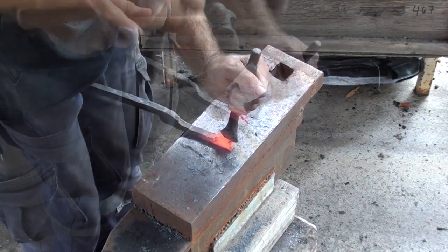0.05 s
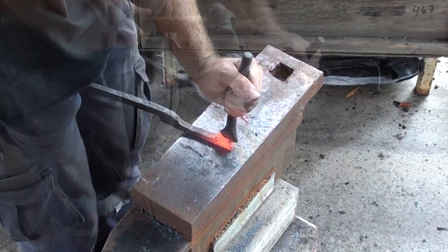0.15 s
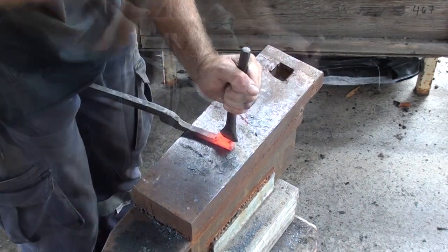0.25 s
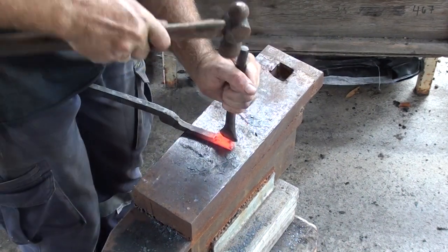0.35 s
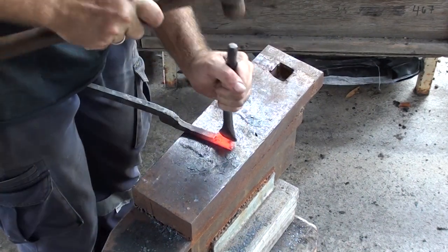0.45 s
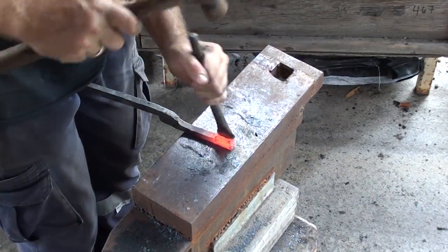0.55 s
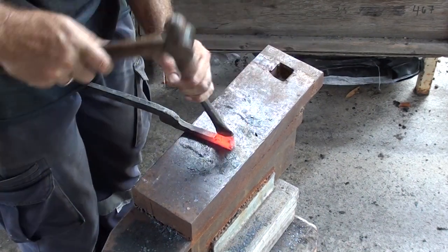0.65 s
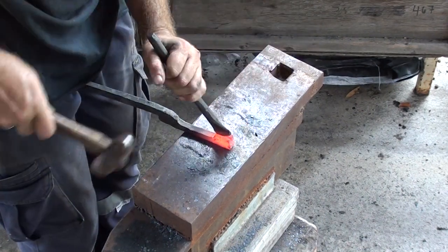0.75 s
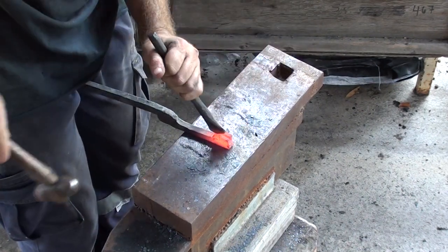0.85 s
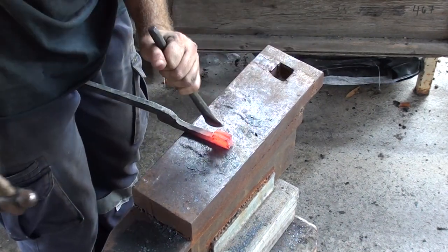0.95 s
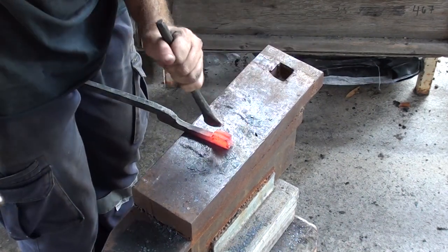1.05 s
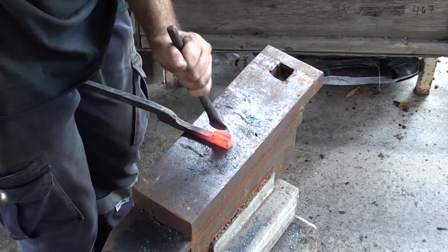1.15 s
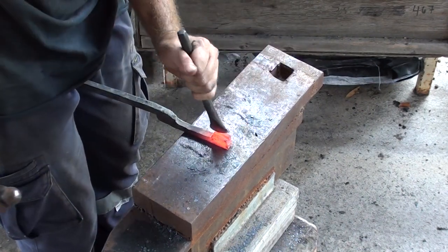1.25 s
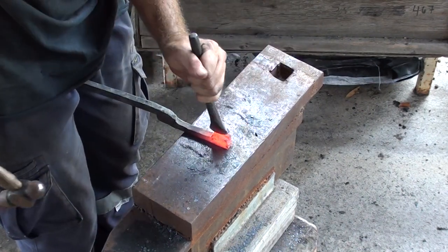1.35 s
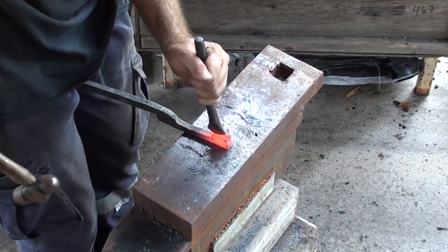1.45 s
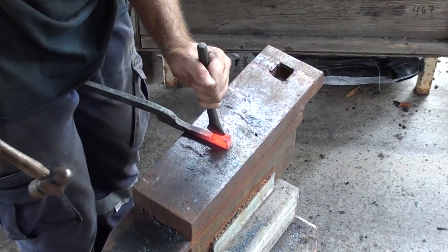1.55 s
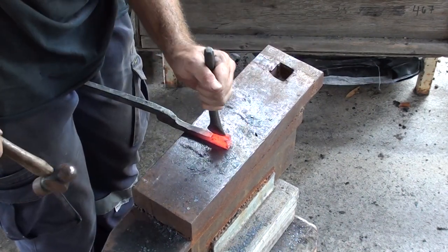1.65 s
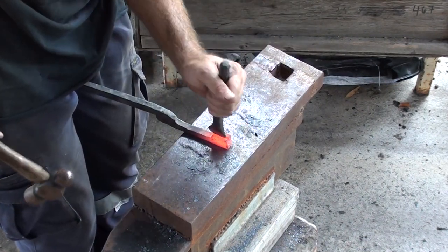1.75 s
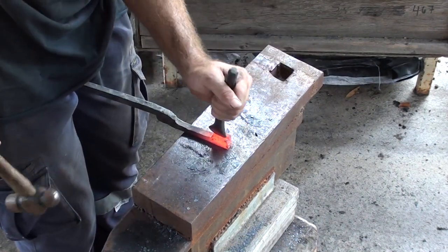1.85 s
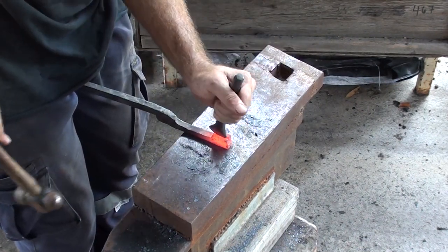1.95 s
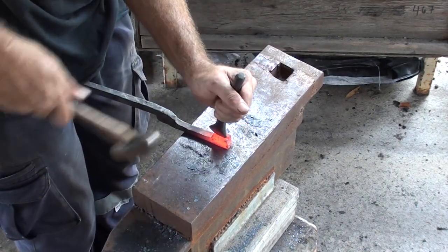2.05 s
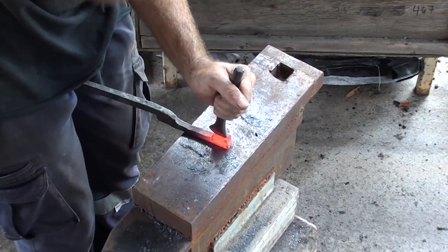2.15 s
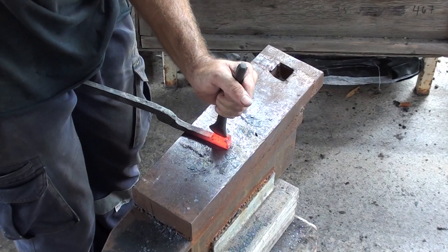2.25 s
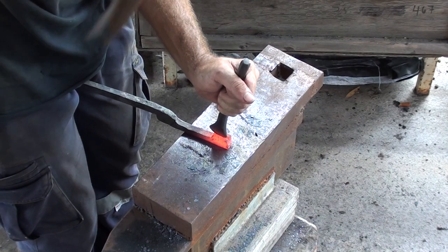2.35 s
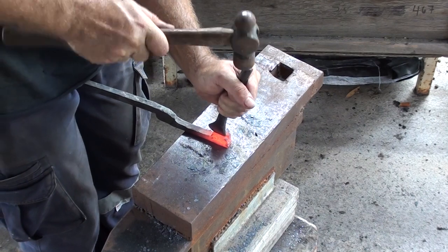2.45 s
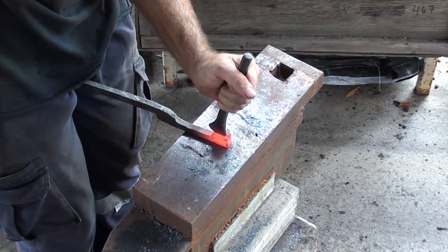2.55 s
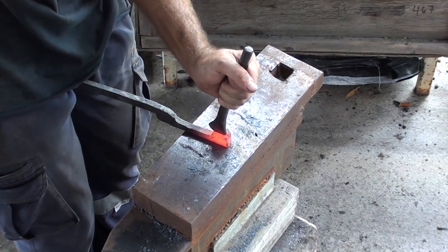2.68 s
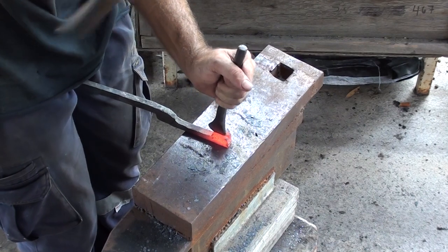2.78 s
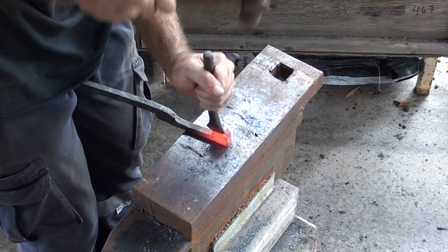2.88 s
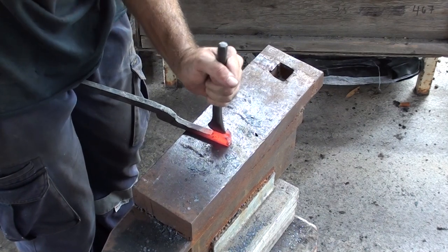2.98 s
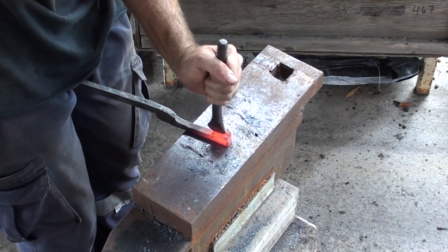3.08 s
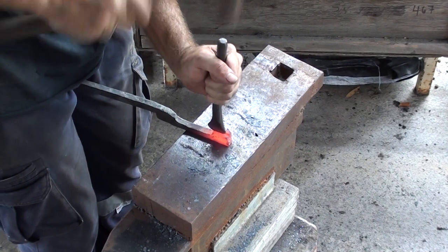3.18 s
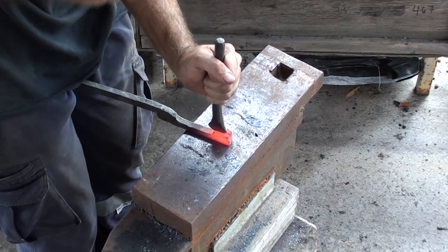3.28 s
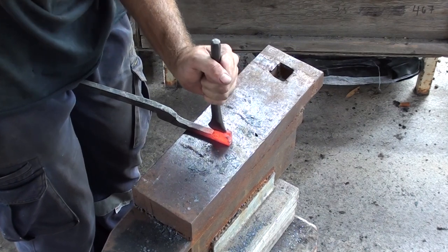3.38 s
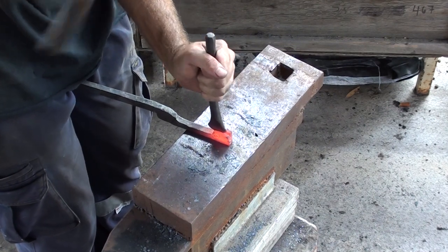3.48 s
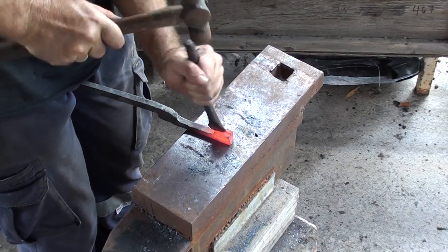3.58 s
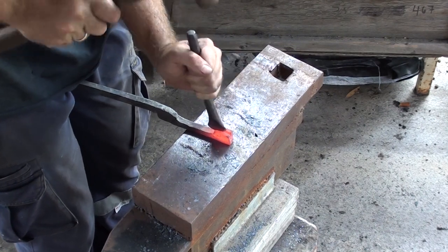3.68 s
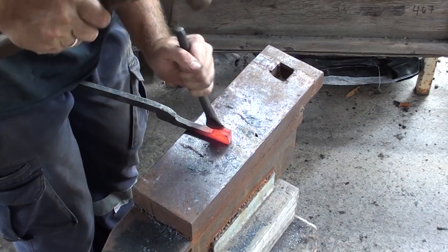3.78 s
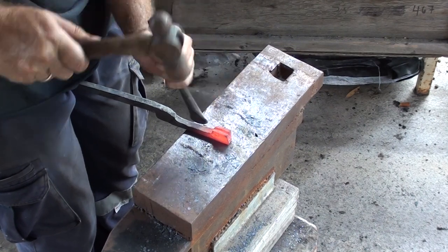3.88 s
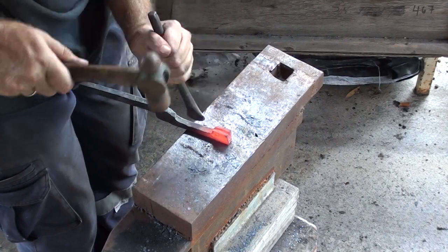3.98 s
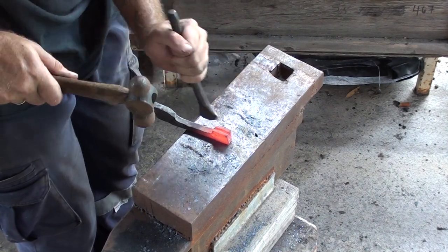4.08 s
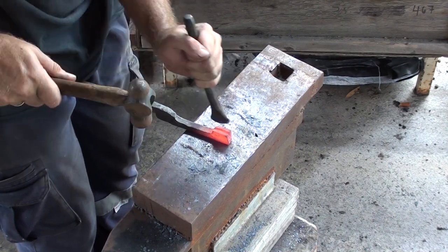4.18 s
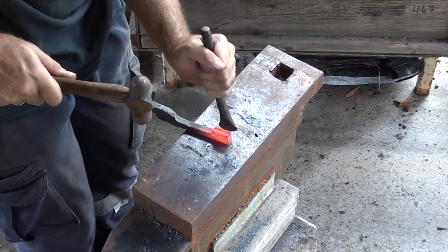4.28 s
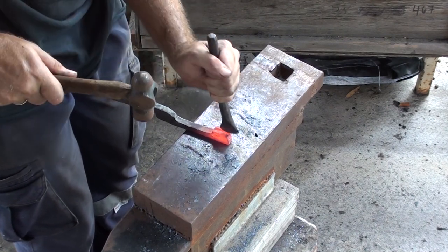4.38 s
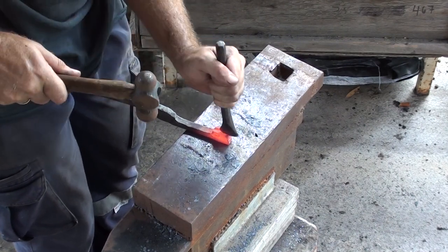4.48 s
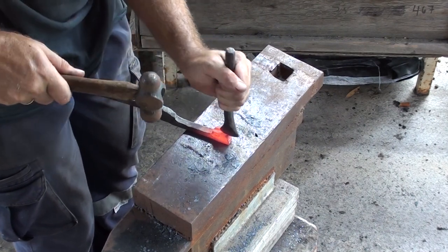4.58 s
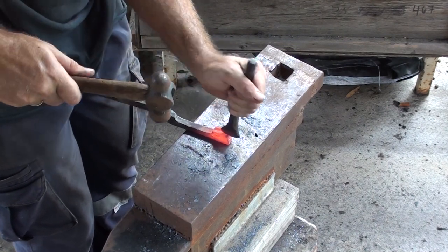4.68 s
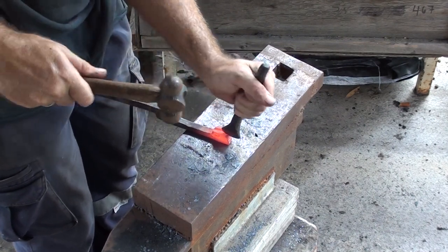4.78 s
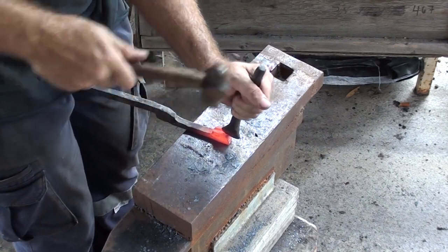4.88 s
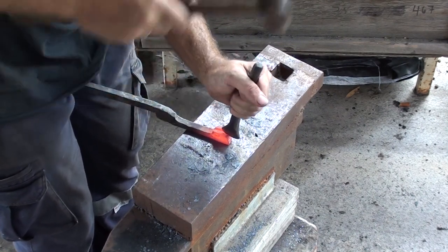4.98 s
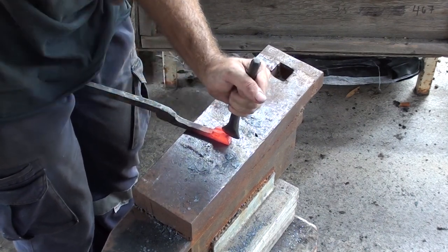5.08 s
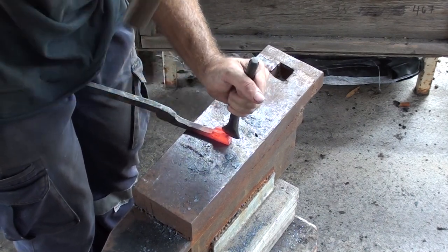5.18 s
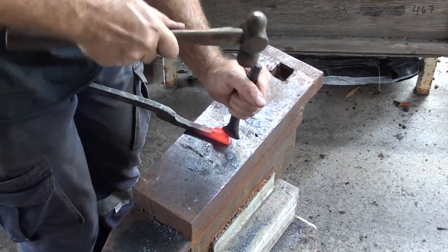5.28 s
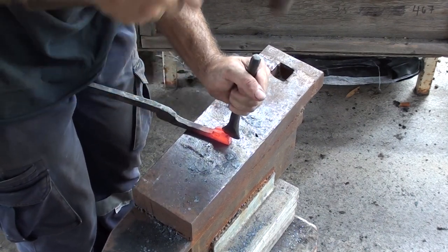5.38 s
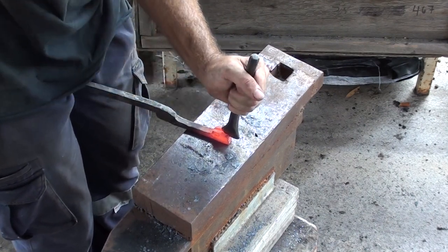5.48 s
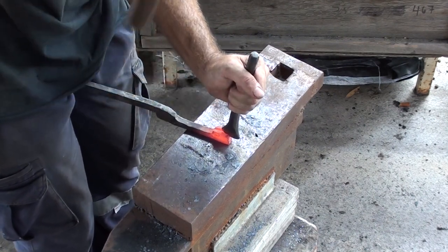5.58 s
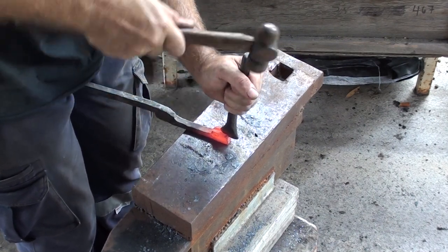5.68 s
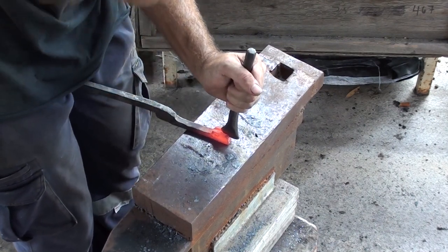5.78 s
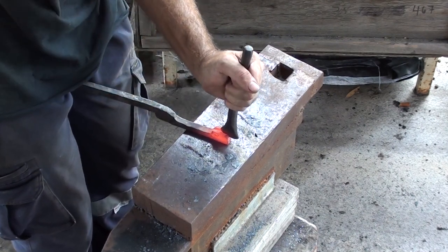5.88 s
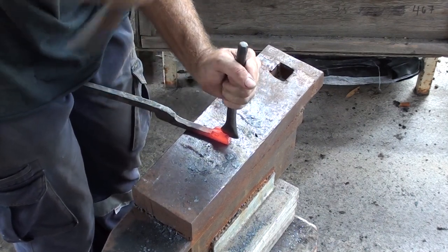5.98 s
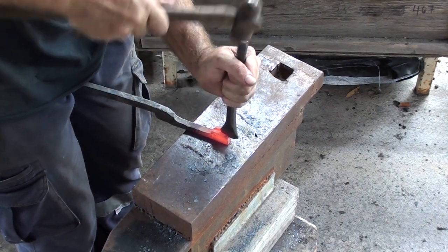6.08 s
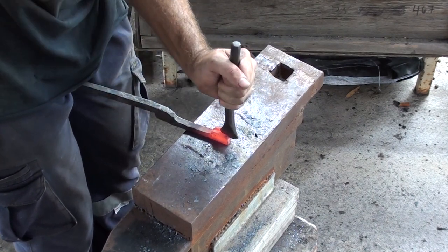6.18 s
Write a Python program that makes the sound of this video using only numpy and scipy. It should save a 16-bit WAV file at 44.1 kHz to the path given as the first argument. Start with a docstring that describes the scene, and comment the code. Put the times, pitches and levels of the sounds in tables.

```python
"""In a workshop with hard walls, a smith hammers a chisel into a red-hot bar on an anvil.
The blows come in three groups. Each one cracks, makes the steel ring and echoes round the room.
Between groups the chisel is set down again with light clicks, over a steady rush, a hiss and a hum.
A nearby camera's limiter (an automatic volume control) holds each blow flat for about a tenth
of a second, and the noise of the shop creeps back afterwards."""
import sys
import numpy as np
from scipy import signal
from scipy.fft import rfft, irfft, next_fast_len
from scipy.io import wavfile
from scipy.ndimage import uniform_filter1d

SR = 44100
rng = np.random.default_rng(int(sys.argv[2]) if len(sys.argv) > 2 else 0)


def wav_record(signal):
    """Record a signal, one row per channel, as 16-bit PCM in the file named by sys.argv[1]."""
    frames = np.transpose(np.atleast_2d(signal))
    bounded = np.clip(frames, -1, 1)
    # unit amplitude maps onto the largest positive 16-bit level
    quanta = np.round(bounded * 32767).astype(np.int16)
    wavfile.write(sys.argv[1], SR, quanta)


N = 275179

AGE = np.arange(SR) / SR  # seconds since a hit
ANVIL_LOW_HZ, ANVIL_MID_HZ, ANVIL_HIGH_HZ, CLANG_HZ = 581, 952, 2395, 1918
# The notes of the struck bar. Each row: pitch in Hz, spread in Hz, level in dB, seconds to fade 60 dB.
BAR_NOTES = [(880, 70, -18.5, .34), (955, 20, -14, .36), (1260, 16, -14.5, .34), (1840, 50, -25, .24),
             (2500, 70, -26, .22), (3350, 110, -22, .25), (4220, 45, -26, .2)]


def hammer_blows(walls):
    """Each blow cracks and rings the anvil, bar and tools, in shares that depend on where it lands."""
    # Each row: start in seconds, force in dB, brightness in dB per octave, gains in dB for anvil, bar,
    # clang, hammer head and chisel, then the contact's resonance in Hz and its height in dB.
    blows = [(-0.014, -1, 0.5, 0, -5.5, -3.5, -0.5, 2, 6300, 11),
             (0.3535, 0, 0.2, 2, -4.5, -2.5, -6.5, 3, 5600, 3.5),
             (2.4762, 2.5, -0.7, 1.5, -1, -1, -1, 4.5, 7020, 9),
             (2.8616, 1, -0.24, -1, 1.5, -7, 2, 5.5, 5330, 5),
             (3.2310, -0.5, -0.55, -1, 3.5, -3, -22, 1.5, 7500, 2.5),
             (3.586, -1.5, -0.6, 1, 0.5, 0.5, 2, 1, 2810, 0),
             (5.3086, -0.5, 0, -0.5, -0.5, -1.5, 11.5, -3.5, 7050, 5),
             (5.6909, -1, -0.4, 4, -1, -4.5, -13, 2.5, 2120, 2.5),
             (6.063, 0.5, 0.24, -0.5, 0, -7.5, 4.5, 3.5, 10870, 11.5)]
    # The notes of each part. Each row: pitch in Hz, spread in Hz, level in dB, seconds to fade 60 dB.
    anvil_notes = [(ANVIL_LOW_HZ, 5.8, -20.5, 0.63), (ANVIL_MID_HZ, 20, -37.5, 0.96),
                   (ANVIL_HIGH_HZ, 8.9, -15, 0.54), (ANVIL_HIGH_HZ, 1, -22.5, 0.74)]  # the high note has a fuzzy part and a pure one
    head_notes = [(8790, 39, -7, 0.33)]
    chisel_notes = [(3650, 110, -16, .25), (3868, 4, -17, .42), (7250, 240, -19, .25),
                    (10870, 100, -14, .31)]
    stand_notes = [(468, 8.9, -25.5, 0.35)]  # the low thud of the anvil on its stand
    out = np.zeros((2, N))
    for start, force_db, bright_db, anvil_db, bar_db, clang_db, head_db, chisel_db, *contact in blows:
        blow = crack(walls, bright_db, *contact)
        blow += amp(anvil_db) * ring(anvil_notes, swell_s=0.017)
        blow += amp(bar_db) * ring(BAR_NOTES, swell_s=0.0025)
        blow += amp(clang_db) * clang()
        blow += amp(head_db) * ring(head_notes, swell_s=0.0005)
        blow += amp(chisel_db) * ring(chisel_notes, swell_s=0.0061)
        blow += snap() + knock() + ring(stand_notes, swell_s=0.0071)
        add(out, start, amp(force_db) * blow)
    return out


def crack(walls, bright_db, contact_hz, contact_db, gain_db=3, contact_width_hz=330):
    """The hammer lands: a burst of noise, boosted around the pitch where the contact resonates."""
    # The tone of the crack. Each row: frequency in Hz, relative level in dB.
    spectrum = [(60, -26), (150, -13), (280, -17.5), (450, -3.5), (850, 1.5), (1100, -3), (1500, -3.5),
                (2100, 10.5), (2700, 3), (3500, 10), (4400, 3.5), (5200, 8.5), (8400, 8.5), (9400, 0),
                (12000, -2.5), (15500, -14)]
    hz = np.fft.rfftfreq(4096, 1 / SR)
    tilt_db = bright_db * np.log2((hz + 200) / 3000)
    peak_db = contact_db / (1 + ((hz - contact_hz) / contact_width_hz) ** 2)
    return amp(gain_db) * coloured(impact(walls, direct_db=-1), look_up(spectrum, hz) + tilt_db + peak_db)


def clang(beat_hz=1.48):
    """Hammer and chisel ring pressed together; two close pitches cancel, cutting the main note short."""
    # Each row: pitch in Hz, spread in Hz, level in dB, seconds to fade 60 dB.
    main_note = [(CLANG_HZ, 4.2, 3.25, 0.48)]
    side_notes = [(1694, 4, -21, .33), (2070, 45, -9, .3), (2294, 8, -16, .3)]
    beat = np.cos(np.pi * beat_hz * AGE)
    return beat * ring(main_note, swell_s=0.1) + ring(side_notes, swell_s=0.0013)


def snap(gain_db=2, decay_s=0.0083):
    """The bright first instant of steel on steel."""
    return amp(gain_db) * np.exp(-AGE / decay_s) * band_noise(low_hz=7900, high_hz=12800)


def knock(gain_db=1, rise_s=0.0032, delay_s=0.009):
    """A short mid-pitched knock, an early echo, follows about 10 ms after the blow."""
    rise = np.maximum(AGE - delay_s, 0) / rise_s
    return amp(gain_db) * rise * np.exp(1 - rise) * band_noise(low_hz=785, high_hz=1900)


def chisel_touches(walls, clink_hz=980, ping_hz=3840):
    """The chisel is set on the bar with a click; held loosely it pings, and the bar clinks."""
    # Each row: start in seconds, then gains in dB for the click, the bar and the chisel's ping.
    touches = [(0.876, -48, -72, -46), (0.893, -62, -72, -36.5), (1.289, -32.5, -47, -56),
               (1.294, -26.5, -31.5, -48), (1.519, -32.5, -36.5, -52), (4.415, -32, -32.5, -55),
               (4.499, -39, -39, -58)]
    # The tone of the click. Each row: frequency in Hz, relative level in dB.
    spectrum = [(100, -27), (500, -4), (1000, -5.5), (2200, -6.5), (4000, -4), (5000, -21), (7800, -12),
                (10000, -44), (15000, -29)]
    out, hz = np.zeros((2, N)), np.fft.rfftfreq(2048, 1 / SR)
    for start, click_db, bar_db, chisel_db in touches:
        tap = impact(walls, direct_db=12.5, contact_s=0.0016, floor_db=-13.5)
        click = amp(click_db - 15.5) * coloured(tap, look_up(spectrum, hz))
        clink = ring([(clink_hz, 8, -4, 0.11)], swell_s=0.0033) + ring(BAR_NOTES, swell_s=0.0012)
        ping = ring([(ping_hz, 45, chisel_db, 0.12)], swell_s=0.0029)
        add(out, start, click + amp(bar_db) * clink + ping)
    return out


def ring(notes, swell_s, clear_hz=18):
    """Fading notes of struck steel; the room swells each one and smears the wide ones into a fuzz."""
    out = np.zeros((2, len(AGE)))
    for hz, spread_hz, db, fade_s in notes:
        fuzzy_share = spread_hz / (spread_hz + clear_hz)
        pure = np.sqrt(1 - fuzzy_share) * np.array([[1], [1j]])
        fuzzy = np.sqrt(fuzzy_share) * flutter(spread_hz + clear_hz, len(AGE))
        tone = np.sqrt(2) * ((pure + fuzzy) * np.exp(2j * np.pi * hz * AGE)).real
        out += amp(db - 60 * AGE / fade_s) * tone
    return out * (1 - np.exp(-AGE / swell_s))


def impact(walls, direct_db, contact_s=0.00059, floor_s=0.00567, floor_db=-2, build_s=0.0079, fresh=0.26):
    """A short contact, its bounce off the floor, then the shop's echo, which shifts as the smith moves."""
    # How long the room echoes. Each row: frequency in Hz, seconds to fade 60 dB.
    echo_times = [(100, 0.45), (400, 0.44), (1000, 0.47), (3000, 0.38), (7000, 0.35), (11000, 0.34),
                  (16000, 0.21)]
    echoes = np.sqrt(1 - fresh) * walls + np.sqrt(fresh) * rng.standard_normal(walls.shape)
    hz, t, bands = signal.stft(echoes, SR, nperseg=256)
    fade = amp(-60 * t / look_up(echo_times, hz)[:, None])
    tail = signal.istft(bands * fade, SR, nperseg=256)[1][:, :len(AGE)]
    burst = AGE / contact_s * np.exp(1 - AGE / contact_s)
    bounce = amp(floor_db) * np.interp(AGE - floor_s, AGE, burst)
    direct = amp(direct_db) * (burst + bounce) * rng.standard_normal(walls.shape)
    return direct + tail * (1 - np.exp(-AGE / build_s))


def shop_rush(level_db=-48, patchy_db=1.33):
    """The steady rush of the workshop, in slowly drifting patches."""
    # The tone of the rush. Each row: frequency in Hz, relative level in dB.
    spectrum = [(34, -29), (52, -3), (70, -13), (100, 1), (175, -10), (350, -4.5), (900, -10), (2800, -20),
                (4400, -20), (6000, -13.5), (7200, -14), (8400, -11), (10200, -26.5), (15500, -27)]
    hz, _, bands = signal.stft(rng.standard_normal((2, N)), SR, nperseg=4096)
    patches = uniform_filter1d(rng.standard_normal(bands.shape[1:]), size=24, axis=0)  # smooth over pitch
    patches = unit_power(uniform_filter1d(patches, size=8, axis=1))  # and over time
    gain = amp(look_up(spectrum, hz)[:, None] + patchy_db * patches)
    rush = signal.istft(bands * gain, SR, nperseg=4096)[1][:, :N]
    return amp(level_db) * unit_power(rush)


def hiss(rest_hz=5310, rest_db=-57.5, sag_hz_per_db=63.5, wander_hz=130):
    """A narrow hiss that wanders at random and sinks in pitch whenever it swells."""
    # Each row: time of a swell's peak in seconds, half length in seconds, rise in dB.
    hiss_swells = [(1.41, 0.059, 5), (4.31, 0.07, 6), (4.9, 0.082, 5.4)]
    drift = unit_power(flutter(width_hz=5, size=next_fast_len(N))[0, :N].real)
    swell_db = swells(hiss_swells)
    centre_hz = rest_hz - sag_hz_per_db * swell_db - wander_hz * drift
    return amp(rest_db + swell_db) * narrow_noise(centre_hz, width_hz=750)


def hum(rest_db=-65.5):
    """A faint, wavering hum in the shop that swells once."""
    # Each row: time of the swell's peak in seconds, half length in seconds, rise in dB.
    hum_swells = [(4.8, 0.54, 11)]
    return amp(rest_db + swells(hum_swells)) * narrow_noise(centre_hz=461, width_hz=24)


def swells(rows):
    """Smooth, bell-shaped rises in level, in dB."""
    t = np.arange(N) / SR
    return sum(db * np.exp(-0.5 * ((t - peak_s) / half_s) ** 2) for peak_s, half_s, db in rows)


def narrow_noise(centre_hz, width_hz):
    """A band of noise around a steady or moving pitch."""
    turns = np.cumsum(centre_hz * np.ones(N)) / SR
    return unit_power((flutter(width_hz, next_fast_len(N))[:, :N] * np.exp(2j * np.pi * turns)).real)


def band_noise(low_hz, high_hz):
    """One second of noise, mostly between two frequencies."""
    band_pass = signal.butter(2, [low_hz, high_hz], "band", fs=SR, output="sos")
    return signal.sosfilt(band_pass, rng.standard_normal((2, len(AGE))))


def flutter(width_hz, size):
    """Two channels of random wobble in strength and phase; a greater width wobbles faster."""
    noise = rng.standard_normal((2, size)) + 1j * rng.standard_normal((2, size))
    hz = np.fft.fftfreq(size, 1 / SR)
    return unit_power(np.fft.ifft(noise / (1 + (2 * hz / width_hz) ** 2)))


def coloured(x, level_db):
    """Shapes a sound's tone, given relative levels at evenly spaced frequencies."""
    cepstrum = irfft(np.log(unit_power(amp(level_db))))
    half = len(cepstrum) // 2
    # Folding onto the first half keeps the filter from sounding before the hit.
    cepstrum[1:half] *= 2
    cepstrum[half + 1:] = 0
    response = irfft(np.exp(rfft(cepstrum)))[None, :half]
    return signal.fftconvolve(x, response, axes=1)[:, :x.shape[1]]


def amp(db):
    """Turns decibels into a gain."""
    return 10 ** (np.asarray(db) / 20)


def unit_power(x):
    """Scales a signal to an average power of one."""
    return x / np.sqrt(np.mean(abs(x) ** 2) + 1e-20)


def look_up(points, hz):
    """Reads between a table's rows on a log-frequency scale."""
    row_hz, value = np.transpose(points)
    return np.interp(np.log(hz + 1), np.log(row_hz + 1), value)


def add(mix, start_s, sound):
    """Adds a two-channel sound to the mix, dropping what falls outside it."""
    at = round(start_s * SR)
    sound = sound[:, max(-at, 0):]
    part = mix[:, max(at, 0):][:, :sound.shape[1]]
    part += sound[:, :part.shape[1]]


def stereo(pair, width):
    """Turns mid (what both ears share) and side (what sets them apart) into left and right."""
    size = next_fast_len(N + SR)
    side_gain = amp(look_up(width, np.fft.rfftfreq(size, 1 / SR)))
    side = irfft(rfft(pair[1], size) * side_gain, size)[:N]
    return np.array([pair[0] + side, pair[0] - side])


def held(over_db, db_per_s):
    """Jumps up with each peak and falls back at a steady rate."""
    fall = np.arange(N) * db_per_s / SR
    return np.maximum.accumulate(over_db + fall) - fall


def scene():
    """Blows and touches in the same room, over the noise of the shop."""
    # Stereo width, small as the microphones are close. Each row: frequency in Hz, side over mid in dB.
    blow_width = [(60, -51), (200, -35), (1000, -19.5), (1950, -22), (2500, -14.5), (5500, -13.5),
                  (8300, -14), (9800, -23.5), (13000, -23)]
    shop_width = [(60, -26), (110, -29), (200, -13.5), (380, -14), (700, -8.5), (1290, -5.5), (2380, -5),
                  (4400, -11.5), (8120, -8.5), (15000, -30)]
    walls = rng.standard_normal((2, len(AGE)))  # the echo pattern that all hits share
    smith = hammer_blows(walls) + chisel_touches(walls)
    background = shop_rush() + hiss() + hum()
    return stereo(smith, blow_width) + stereo(background, shop_width)


def record(dry, threshold_db=-16, squeeze=0.87, linger_db=4.5, ceiling_db=-1, top_hz=15900):
    """A limiter turns loud moments down; then peaks are rounded off and the highest treble is cut."""
    power_db = 10 * np.log10(abs(uniform_filter1d((dry ** 2).mean(0), size=130)) + 1e-12)
    over_db = squeeze * np.maximum(power_db - threshold_db, 0)
    # The limiter lets go quickly, except for its last few dB.
    cut_db = np.maximum(held(over_db, db_per_s=235), held(np.minimum(over_db, linger_db), db_per_s=2))
    limited = dry * amp(-uniform_filter1d(cut_db, size=40))
    rounded = amp(ceiling_db) * np.tanh(limited / amp(ceiling_db))
    low_pass = signal.firwin(301, top_hz, window=("kaiser", 9), fs=SR)
    return signal.oaconvolve(rounded, low_pass[None], "same", axes=1)


dry = scene()
out = record(dry)
wav_record(out)
```